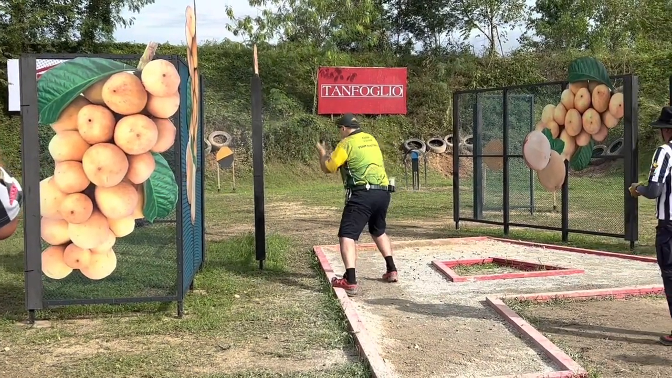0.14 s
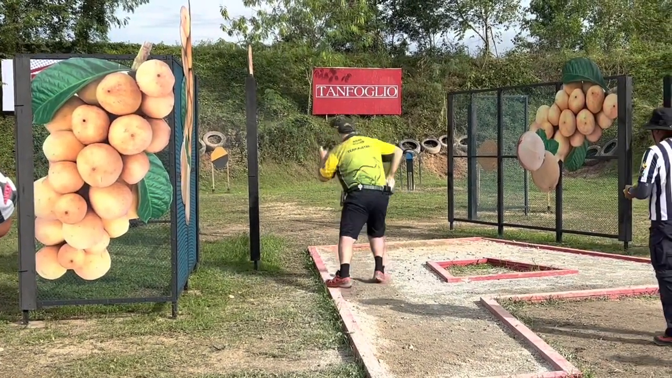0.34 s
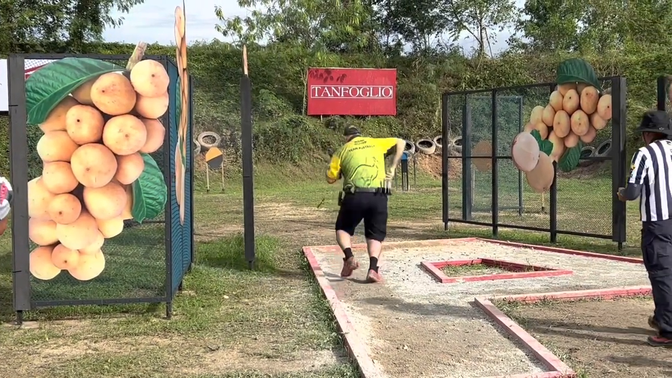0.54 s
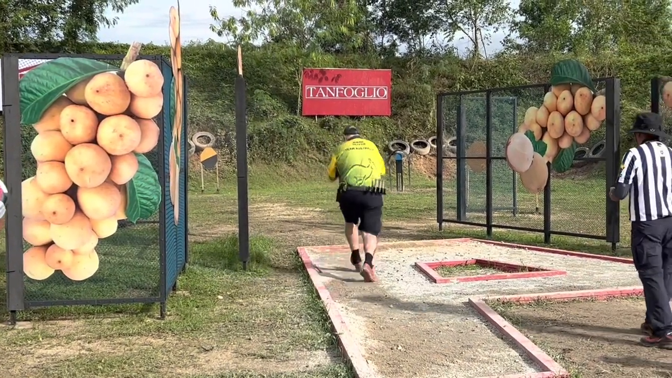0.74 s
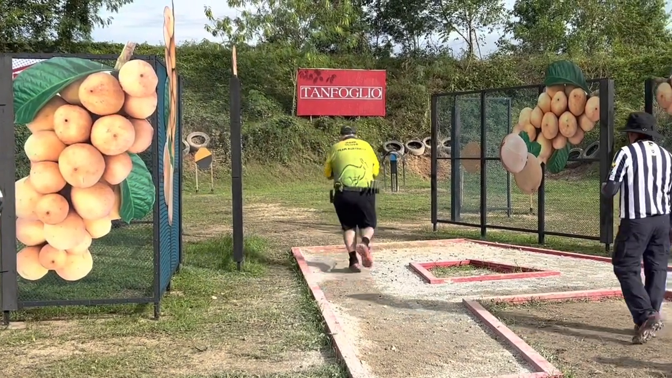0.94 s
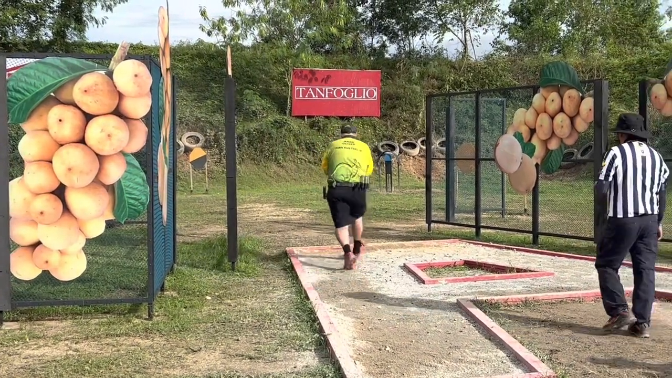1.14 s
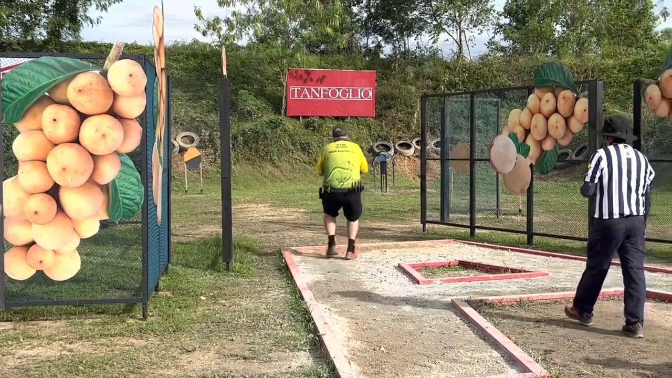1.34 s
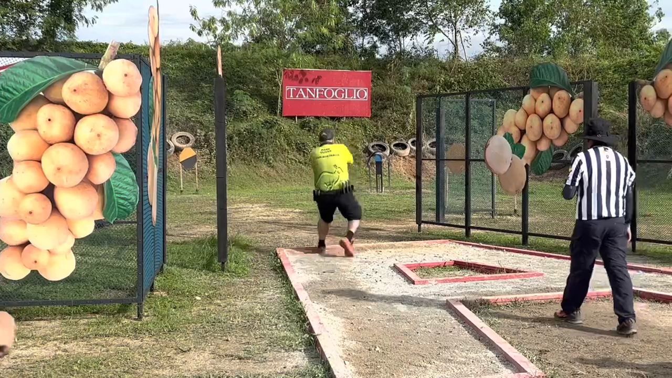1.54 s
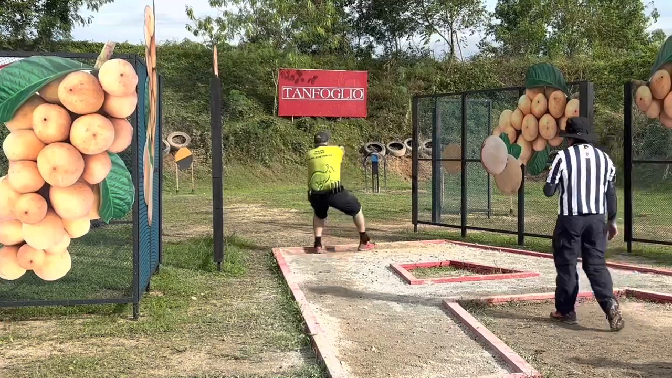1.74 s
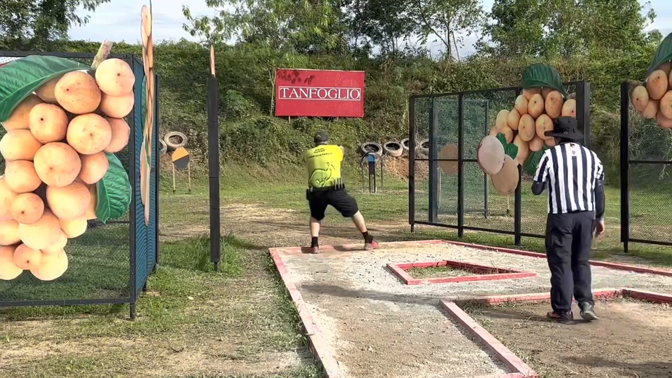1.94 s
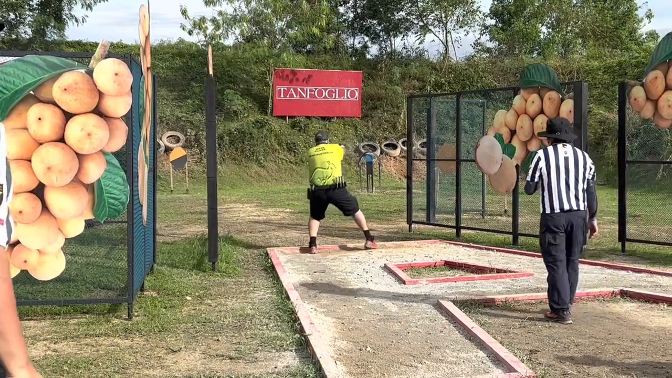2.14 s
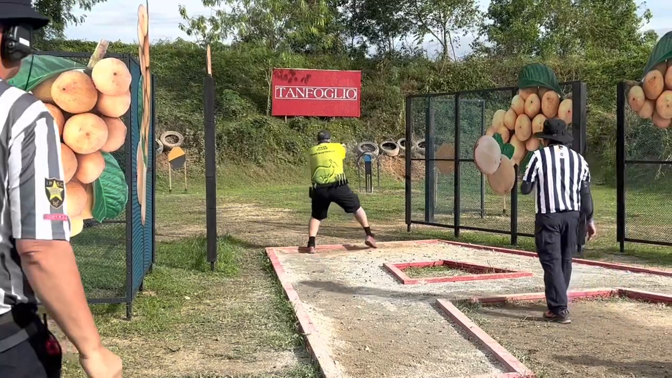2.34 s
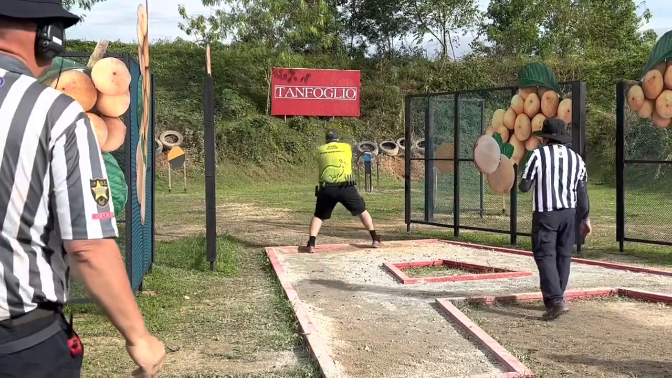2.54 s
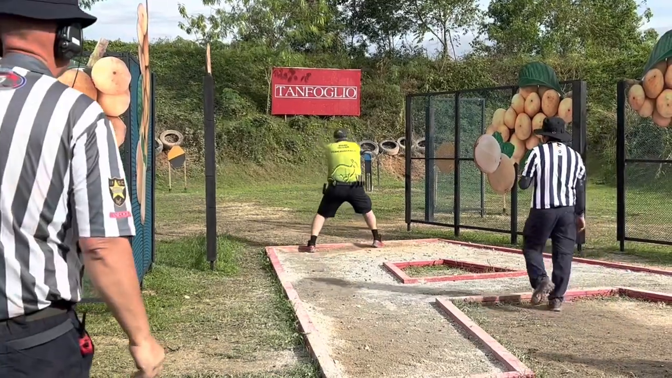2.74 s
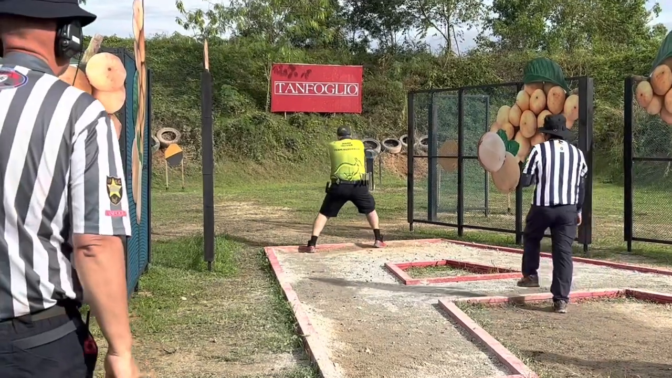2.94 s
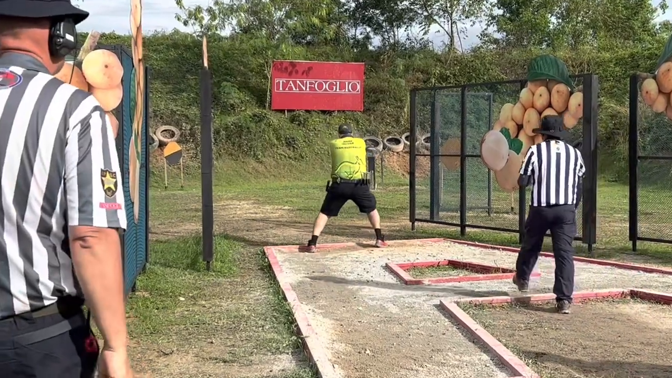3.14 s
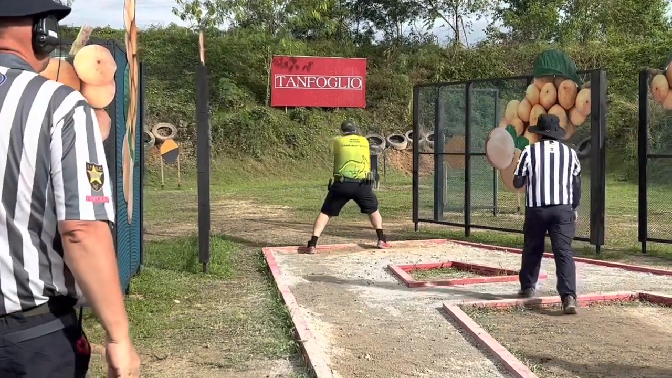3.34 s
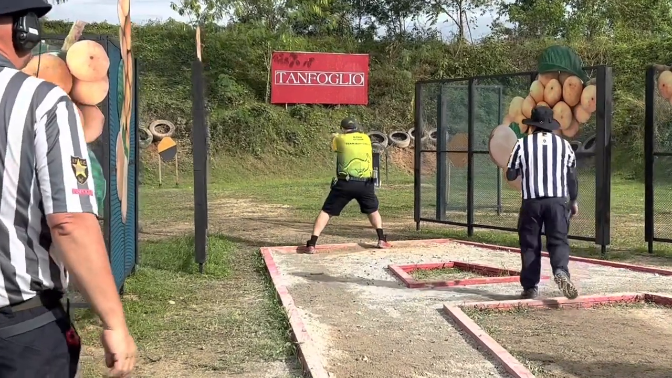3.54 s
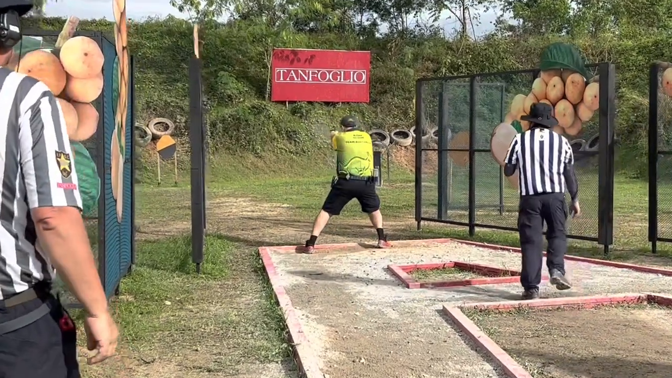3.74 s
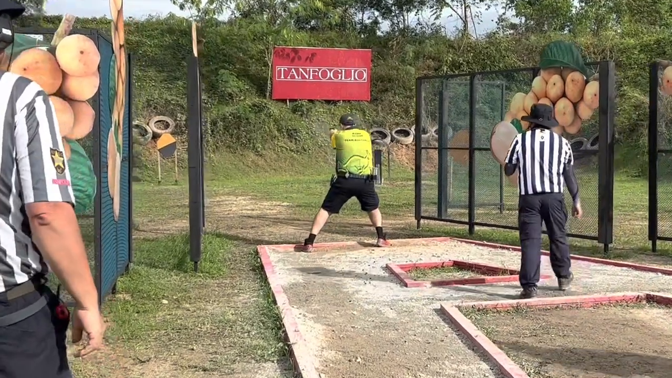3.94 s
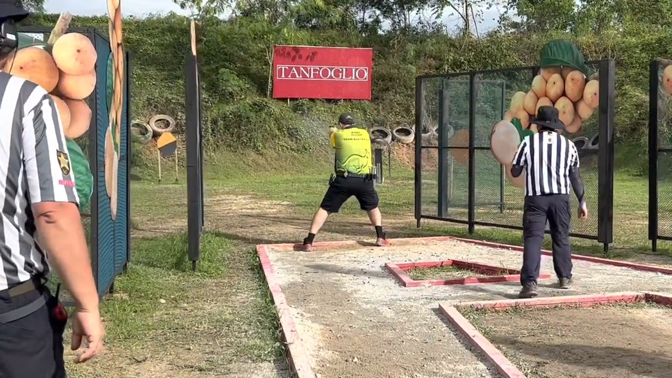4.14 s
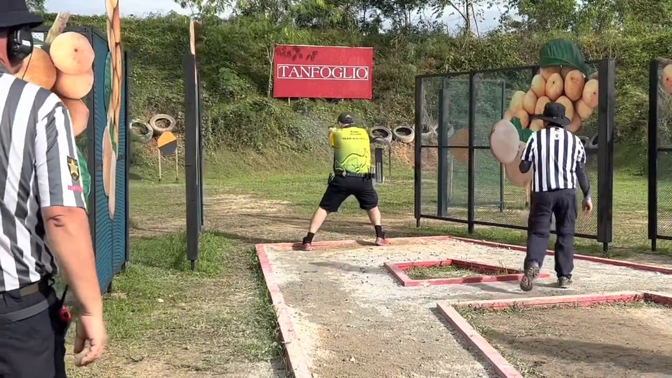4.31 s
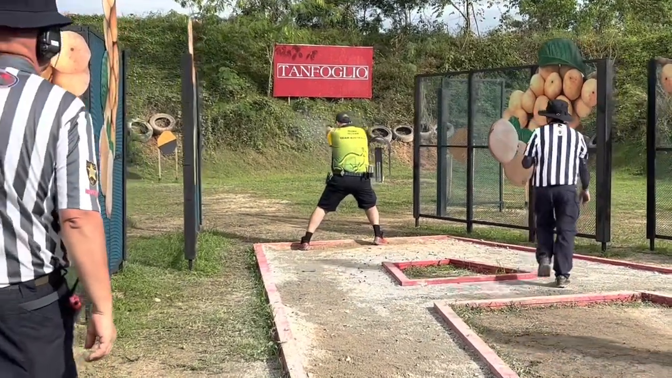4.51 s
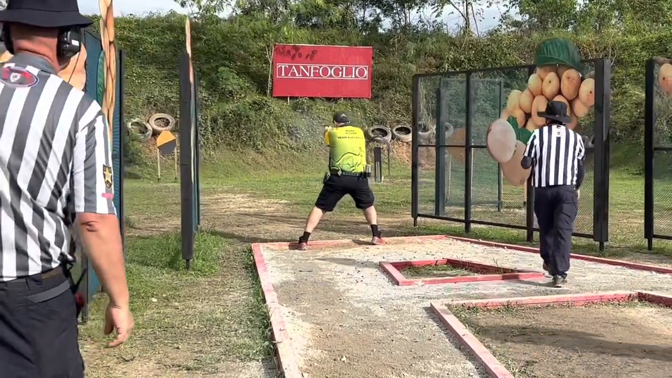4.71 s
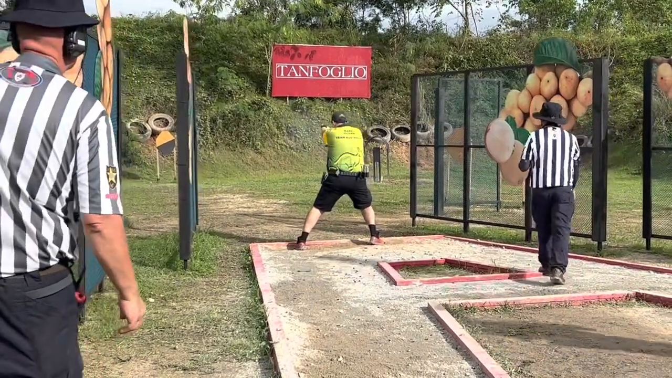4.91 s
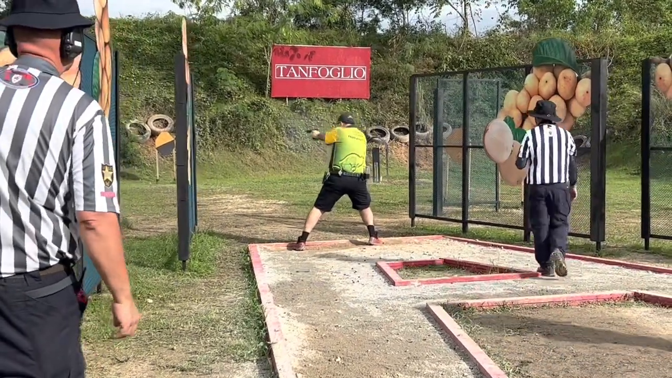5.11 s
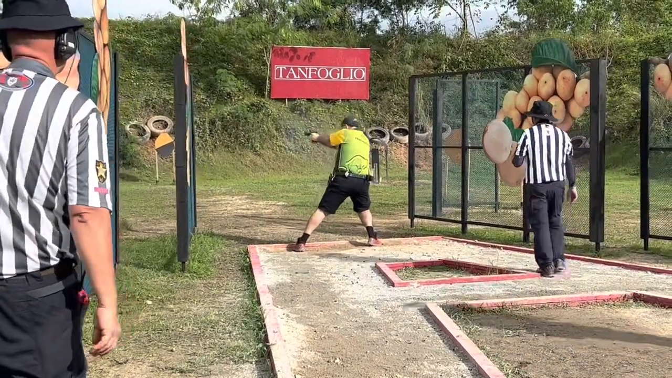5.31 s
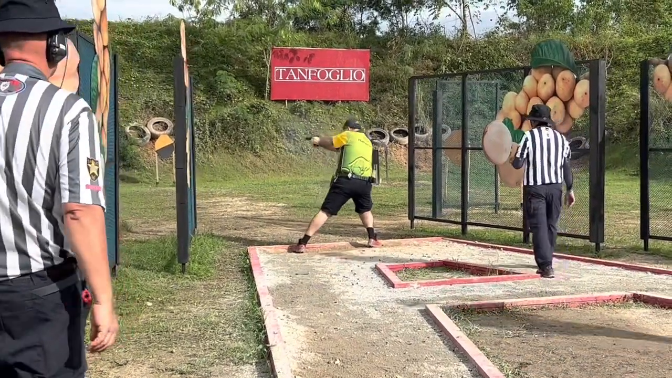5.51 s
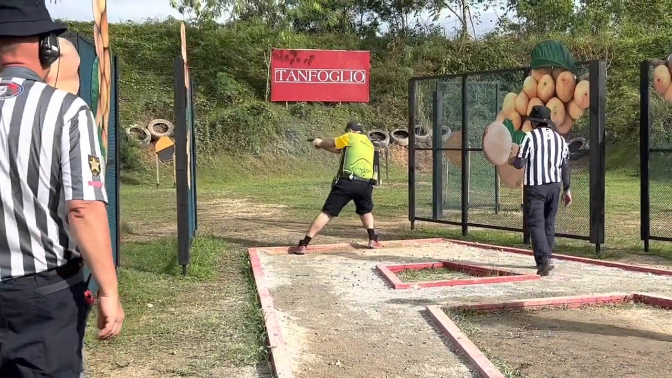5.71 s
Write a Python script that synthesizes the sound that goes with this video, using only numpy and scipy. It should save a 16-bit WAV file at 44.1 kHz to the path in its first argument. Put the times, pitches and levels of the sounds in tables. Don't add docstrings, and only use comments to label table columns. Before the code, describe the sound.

Seven loud, sharp pistol shots crack at an outdoor range, each with a short rough echo; the third bullet rings a steel plate.

```python
import sys
import numpy as np
from scipy import signal
from scipy.fft import rfft, irfft, next_fast_len
from scipy.io import wavfile
from scipy.ndimage import uniform_filter1d, map_coordinates

SR = 44100
rng = np.random.default_rng(int(sys.argv[2]) if len(sys.argv) > 2 else 0)


def gain_from_db(level_db):
    decades = np.asarray(level_db, float) / 20
    return 10 ** decades


def to_wav(sig):
    pcm = np.clip(np.atleast_2d(sig), -1, 1) * 32767
    pcm = np.round(pcm).astype(np.int16)
    wavfile.write(sys.argv[1], SR, pcm.T)


N = 258822

# start_s, wind_db, rustle_db
WIND_AND_RUSTLE = [(0, -64, -61.5), (.1, -75, -63.5), (.2, -73, -72), (.44, -69, -73), (.69, -76.5, -76.5),
                   (.76, -69, -75.5), (1.06, -71, -69), (1.1, -68, -65), (1.35, -70, -72), (1.75, -66, -69),
                   (1.82, -68, -71), (1.97, -56.5, -65), (2.8, -59.5, -56.5), (2.86, -64, -64),
                   (3.5, -64.5, -71.5), (3.62, -58.5, -70.5), (5.0, -67, -73.5), (5.55, -72, -73.5)]
# pitch_hz, level_db (per Hz)
WIND_COLOUR = [(12, -41.5), (20, -22.5), (47, -2), (86, 2.5), (124, -5), (200, -3.5), (300, -15.5),
               (390, -40), (660, -120)]
# pitch_hz, level_db (per Hz)
RUSTLE_COLOUR = [(200, -10), (350, -6), (700, -5.5), (1200, -8.5), (3600, -18.5), (9000, -25),
                 (11500, -29.5), (13000, -41.5), (16000, -59.5)]

# (above 7 kHz, over peak)
GEAR = [(0.029, -50, 3000, -18), (0.084, -50, 3500, -18), (0.111, -48, 2800, -23),
        (0.754, -33, 7600, -11.5), (.757, -40, 3560, -13), (.771, -41, 2440, -15), (.789, -47, 2150, -15),
        (0.855, -55.5, 4380, -15), (1.038, -49, 2380, -37), (1.076, -52, 2480, 1.5), (1.09, -38, 2260, -10),
        (1.102, -50, 1330, 7.5), (1.177, -52.5, 1900, -32), (1.42, -56, 1930, -34), (1.443, -54, 1930, -32),
        (1.465, -54, 1900, -30), (1.944, -67, 1570, 3)]
GEAR_THUMP_DB, GEAR_T60_S = -17.5, 0.052
# (below 700 Hz, over peak)
STEPS = [(0.191, -65, -10), (.469, -65, -6), (1.289, -61, -9), (1.556, -53.5, -1.5), (1.574, -49, -5),
         (1.624, -59.5, -5), (1.673, -70, 13.5), (1.709, -49, -4.5), (1.725, -50, -9.5),
         (1.738, -50.5, -12), (1.957, -65.5, 3.5), (5.369, -66.5, 4.5), (5.519, -70, 3)]
STEP_HZ, STEP_FIZZ_DB, STEP_T60_S = 1500, -29, .075
# start_s, pitch_hz, level_db, t60_s
CLINKS = [
    (1.039, 2400, -52, .03),
    (1.039, 3100, -55, .025),
    (.772, 2400, -52, .06),
    (1.945, 5500, -60, .02),
    (1.957, 5200, -60, .025),
    (1.925, 11800, -70, .25),
]

# start_s, strength_db, aim (0 right, 1 left), push_db (below 140 Hz), boom_db
SHOTS = [
    (2.0339, -1, 0.11, -29, -33.5),
    (2.3063, -0.2, .2, -32, -48),
    (2.9307, -3, .35, -41.5, -61.5),
    (3.6553, -0.33, 1.02, -20, -38.5),
    (4.1115, -1, .86, -17.5, -40),
    (4.5349, -0.35, .8, -27.5, -53.5),
    (5.6032, 0.5, 1.15, -14.5, -32.5),
]
# delay_s, delay_change_s (at full aim), best_aim, loss_db (per squared aim off it)
PATHS = [
    (0, 0, .5, 3.1),
    (.0062, .0002, 0.39, 15.5),
    (0.0189, -.0018, 0.92, 6),
    (0.0299, .0075, .5, 3.4),
    (.0545, -.0006, .9, 22),
    (0.0766, .0001, .83, 293.5),
]
# crack_db, then level_db near 2.2 kHz, 1 kHz, 500 Hz and 250 Hz
PATH_COLOURS = [(-4.5, -15.5, -9.5, -23, -16), (-15, -20.5, -10.5, -27.5, -21.5),
                (-12.5, -17.5, -11.5, -29, -31.5), (-19, -31, -31, -27.5, -32),
                (-16, -24, -27, -20.5, -24.5), (-17, -43, -41.5, -41.5, -37)]
# pitch_hz, width_hz, level_db
CRACK_BANDS = [(3700, 1100, 3.5), (7300, 2200, 4), (12000, 8000, 1)]
# pitch_hz, width_hz, level_db
BLAST_BANDS = [(2450, 2200, 32.5), (1000, 500, 37.5), (560, 410, 41.5), (220, 260, 41.5)]
RAGGED_DB, RAGGED_S = 2.26, 0.00022

# after_s, pitch_hz, level_db
BANK_THUMPS = [
    (.034, 523, -31.5),
    (.098, 326, -27),
    (.112, 600, -35.5),
    (.178, 169, -34),
    (.272, 693.8, -52),
]
# pitch_hz, level_db
SCATTER_COLOUR = [(40, -30), (90, -9.5), (400, -1.5), (1100, 3), (1600, 0), (3600, 6), (5400, 2), (8300, 7),
                  (12000, 3.5), (16000, -8.5)]
# peak_s (after the shot), rise_s (60 dB), t60_s, colour as (pitch_hz, level_db) points
SMEAR = (-0.0049, 0.009, .03, [(200, -24), (500, -15), (900, -24), (4000, -42), (12000, -78.5)])
NEAR = (0.0022, .012, .33, [(200, -2), (900, -7.5), (4000, -20.5), (12000, -32)])
BANK = (0.089, .7, 0.32, [(200, -7.5), (900, -23.5), (2000, -30), (4000, -27), (12000, -33)])
WOODS = (.02, .03, 1, [(200, -21.5), (900, -26.5), (4000, -39.5), (12000, -51.5)])
WOODS_AIM_DB = -7
LEAD_S = .02
BOOM_S, BOOM_AIM_S = 0.2, -0.053
# pitch_hz, level_db (per Hz)
FAR_COLOUR = [(200, -18.5), (600, 0.5), (1200, 5), (3500, -5.5), (8000, -11.5), (12000, -30.5)]
FAR_DB, FAR_AIM_DB = -62, -5

PLATE_S = 2.9992
PLATE_HZ = [1141, 2589, 4377, 4898, 5496, 6650, 6770, 7149, 8290, 8366, 8746]
# level_db, t60_s, lasting_db
PLATE_RINGS = [(-48.5, 1.3, -80), (-43, .25, -57), (-44, .15, -62), (-28, .1, -49), (-44, .2, -62),
               (-42, .15, -60), (-40, .15, -58), (-44, .16, -60), (-30, .08, -53), (-31, .07, -56),
               (-31, .07, -56)]
PLATE_ECHO_S, PLATE_ECHO_DB = .09, -15
FACE_S, FACE_WIDTH_S, FACE_DB, EDGE_DB = 0.406, 0.038, 20.5, -.5
ROCK_DB = -1

# pitch_hz, width_hz
PORT_NOTCHES = [(10200, 1500), (14000, 1900)]
# pitch_hz, level_db
ACROSS = [(50, -20), (250, -16), (1000, -15), (2500, -12), (4500, -11), (6500, -30), (9000, -7),
          (16000, -6)]


def unit(x):
    return x / np.sqrt(np.mean(x ** 2) + 1e-20)


def along(points, hz):
    f, v = np.transpose(points)
    return np.interp(np.log(hz + 1), np.log(f + 1), v)


def filtered(x, response):
    m = next_fast_len(x.shape[-1] + 8192)
    spectrum = rfft(x, m) * response(np.fft.rfftfreq(m, 1 / SR))
    return irfft(spectrum, m)[..., :x.shape[-1]]


def mode(f, hz, width):
    return 1j * f * width / (hz * hz - f * f + 1j * f * width)


def bump(t, centre, width):
    return np.exp(-.5 * ((t - centre) / width) ** 2)


def wobble(t, rate):
    return map_coordinates(rng.standard_normal(int(len(t) * rate / SR) + 4), [t * rate])


def train(times, db):
    return np.bincount(np.round(np.asarray(times) * SR).astype(int), gain_from_db(db), N + SR)[:N]


def add(out, s, x):
    part = out[..., round(s * SR):][..., :x.shape[-1]]
    part += x[..., :part.shape[-1]]


def pair(size, spectrum, wide_db):
    a, b = filtered(rng.standard_normal((2, size)), lambda f: gain_from_db(along(spectrum, f)))
    return unit(np.array([a + gain_from_db(wide_db) * b, a - gain_from_db(wide_db) * b]))


def patches(shape, depth_db, bins, frames):
    field = uniform_filter1d(rng.standard_normal(shape), bins, 0)
    return gain_from_db(depth_db * unit(uniform_filter1d(field, frames, 1)))


def air():
    s, wind_db, rustle_db = np.transpose(WIND_AND_RUSTLE)
    t = np.arange(N) / SR
    lumps_db = 2.1 * wobble(t, 14)
    wind = gain_from_db(np.interp(t, s, wind_db) + lumps_db) * pair(N, WIND_COLOUR, wide_db=-21.5)
    z = signal.stft(pair(N, RUSTLE_COLOUR, wide_db=-4.0), nperseg=256)[2]
    z = z * patches(z.shape[1:], depth_db=2.0, bins=12, frames=5)
    rustle = signal.istft(z, nperseg=256)[1][:, :N]
    return wind + gain_from_db(np.interp(t, s, rustle_db)) * rustle


def earlier_boom():
    t = np.arange(N) / SR
    return gain_from_db(-59.5) * bump(t, .05, 0.081) * np.sin(2 * np.pi * 48 * t)


def contact(db, hz, t60, fizz_db, thump_db):
    t = np.arange(SR // 5) / SR
    grit = pair(len(t), [(20, 0)], wide_db=-17.0) * gain_from_db(1.7 * wobble(t, 570))

    def layer(gain_db, response):
        return gain_from_db(gain_db) * unit(filtered(grit, response))

    body = layer(db - 11, lambda f: mode(f, hz, .9 * hz) ** 2 + .15 * mode(f, 4000, 4000) ** 2)
    fizz = layer(db + fizz_db - 4, lambda f: mode(f, 9500, 8000) ** 2)
    thump = layer(db + thump_db - 4.0, lambda f: mode(f, 290, 500) ** 2)
    rise = 1 - np.exp(-t / 0.00058)
    fall = gain_from_db(-60 * t / t60) + gain_from_db(-17.5 - 60 * t / 0.52)
    return rise * (body + fizz + thump) * fall


def magazine_and_belt():
    out = np.zeros((2, N))
    for s, db, hz, fizz_db in GEAR:
        add(out, s, contact(db, hz, GEAR_T60_S, fizz_db, GEAR_THUMP_DB))
    return out


def gravel_steps():
    out = np.zeros((2, N))
    for s, db, thump_db in STEPS:
        add(out, s, contact(db, STEP_HZ, STEP_T60_S, STEP_FIZZ_DB, thump_db))
    return out


def clinks():
    out, t = np.zeros(N), np.arange(SR // 5) / SR
    for s, hz, db, t60 in CLINKS:
        add(out, s, gain_from_db(db - 60 * t / t60) * np.sin(2 * np.pi * hz * t))
    return out


def blasts():
    shot_s, shot_db, aim = np.transpose(SHOTS)[:3, :, None]
    delay, shift, best, loss_db = np.transpose(PATHS)
    chance = rng.standard_normal((len(SHOTS), len(PATHS), len(BLAST_BANDS) + 2))
    ragged_s = RAGGED_S * chance[..., -1] * (delay > 0)
    s = (shot_s + delay + shift * aim + ragged_s).ravel() + 0.00065
    path_db = shot_db - loss_db * (aim - best) ** 2
    levels = path_db[..., None] + np.array(PATH_COLOURS) + RAGGED_DB * chance[..., :-1]
    crack_db, *band_db = levels.reshape(len(s), -1).T

    bounce_s = np.abs(.00078 + .00015 * chance[..., -1].ravel())
    crack = train(s, crack_db) + train(s + bounce_s, crack_db + 6.5)
    t = np.arange(SR // 100) / SR
    for when, db in zip(s, crack_db):
        add(crack, when, gain_from_db(db + 2.0 - 60 * t / 0.0062) * rng.standard_normal(len(t)))

    def crack_response(f):
        return sum((-1) ** k * gain_from_db(db) * mode(f, hz, width) for k, (hz, width, db) in enumerate(CRACK_BANDS))

    out = filtered(crack, crack_response)
    uneven_s = .0003 * rng.standard_normal((len(BLAST_BANDS), len(s)))
    for (hz, width, db), level_db, slip in zip(BLAST_BANDS, band_db, uneven_s):
        out += filtered(train(s + slip, level_db + db), lambda f: mode(f, hz, width) ** 2)
    return out


def muzzle_push():
    shots = np.transpose(SHOTS)
    s, push_db = shots[0] + .0005, shots[3]
    pushes = train(s, push_db + 53.5) + train(s + .014, push_db + 43)
    return filtered(pushes, lambda f: mode(f, 57, 150) ** 2)


def scatter_gain(hz, after, aim):
    power = 0
    woods_db = WOODS_AIM_DB * (aim - .6)
    for (peak, rise, t60, colour), db in zip((SMEAR, NEAR, BANK, WOODS), (0, 0, 0, woods_db)):
        shape_db = -60 * np.maximum((peak - after) / rise, (after - peak) / t60)
        allowed = (after > 0) | (peak < 0)
        power = power + gain_from_db(along(colour, hz)[:, None] + shape_db + db) ** 2 * allowed
    return np.sqrt(power)


def scattered_returns():
    out = np.zeros((2, N))
    for s, shot_db, aim, _, _ in SHOTS:
        noise = pair(int(.7 * SR), SCATTER_COLOUR, wide_db=-11.0)
        hz, when, z = signal.stft(noise, SR, nperseg=256)
        gain = scatter_gain(hz, when - LEAD_S, aim) * gain_from_db(.4 * shot_db - 3)
        fronts = patches(gain.shape, depth_db=3.0, bins=6, frames=2)
        add(out, s - LEAD_S, signal.istft(z * fronts * gain, SR, nperseg=256)[1])
    return out


def bank_thumps():
    out, s = np.zeros(N), np.transpose(SHOTS)[0]
    for after, hz, db in BANK_THUMPS:
        chance = rng.standard_normal(len(s))
        thumps = train(s + after + .003 * chance, db + 41 + 2 * chance)
        out += filtered(thumps, lambda f: mode(f, hz, 0.47 * hz) ** 2)
    return out


def booms():
    out, t = np.zeros(N), np.arange(int(.7 * SR)) / SR
    for s, _, aim, _, boom_db in SHOTS:
        swell = bump(t, BOOM_S + BOOM_AIM_S * aim, 0.1) + .03 * bump(t, .33, .07)
        tone = np.sin(2 * np.pi * (52 * t - 12 * t * t) + 6 * rng.random())
        add(out, s, gain_from_db(boom_db) * swell * tone)
    return out


def far_slope():
    out, t = np.zeros((2, N)), np.arange(int(.7 * SR)) / SR
    late = 1.2 * bump(t, .44, 0.026) + 0.87 * bump(t, .45, .07)
    for s, _, aim, _, _ in SHOTS:
        add(out, s, gain_from_db(FAR_DB + FAR_AIM_DB * aim) * late * pair(len(t), FAR_COLOUR, wide_db=-4.5))
    return out


def plate():
    out, t = np.zeros(N), np.arange(int(.7 * SR)) / SR
    facing = bump(t, FACE_S, FACE_WIDTH_S)
    for k, (hz, (db, t60, lasting_db)) in enumerate(zip(PLATE_HZ, PLATE_RINGS)):
        rock = wobble(t, 55) * (.8 if k else .15)
        turn_db = EDGE_DB * facing + 3.0 if k else FACE_DB * facing - 2.0
        fall = gain_from_db(db + 2.3 - 60 * t / t60) + gain_from_db(lasting_db - 2.0 - 60 * t / 0.72)
        ring = fall * gain_from_db(turn_db + ROCK_DB * rock) * np.sin(2 * np.pi * hz * t + 0.7 * rock)
        add(out, PLATE_S, ring)
        echo_gain = gain_from_db(PLATE_ECHO_DB - 60 * t / 1.2) * (1 - np.exp(-t / 0.014))
        add(out, PLATE_S + PLATE_ECHO_S, echo_gain * ring)
    splash = filtered(rng.standard_normal(len(t)), lambda f: mode(f, 7000, 13000))
    add(out, PLATE_S, gain_from_db(-23.5 - 60 * t / 0.045) * splash)

    def knock(f):
        high = gain_from_db(-9.5) * mode(f, 8400, 2000) ** 2
        low = gain_from_db(-12.5) * mode(f, 900, 1200) ** 2
        return mode(f, 2400, 1800) ** 2 + high + low

    return out + filtered(train([PLATE_S], [18]), knock)


def scene():
    a_little_left = gain_from_db([[.4], [-.4]])
    before = air() + earlier_boom() + magazine_and_belt() + gravel_steps() + clinks()
    direct = (blasts() + muzzle_push() + plate()) * a_little_left
    return before + direct + scattered_returns() + bank_thumps() + booms() + far_slope()


def camera_limit(x):
    top, knee, top_hz = .9, 5, 15900
    rounded = x / (1 + np.abs(x / top) ** knee) ** (1 / knee)
    return filtered(rounded, lambda f: 1 / (1 + (f / top_hz) ** 80))


def band_limit(x):
    return signal.sosfilt(signal.butter(12, 17120, fs=SR, output="sos"), x)


def record(dry):
    late = filtered(dry, lambda f: np.exp(-2j * np.pi * 1.06 * np.log((f + 25) / 16000)))
    mid, side = (late[0] + late[1]) / 2, (late[0] - late[1]) / 2
    side = filtered(side, lambda f: np.abs(1 - .9 * mode(f, 6500, 5000)))
    side = side + filtered(mid, lambda f: 1j * gain_from_db(along(ACROSS, f)))

    def notches(f):
        return np.prod([np.abs(1 - mode(f, hz, width)) ** 2.2 for hz, width in PORT_NOTCHES], axis=0)

    mid = filtered(mid, notches)
    mix = camera_limit(np.array([mid + side, mid - side]))
    return band_limit(mix)


dry = scene()
out = record(dry)
to_wav(out)
```